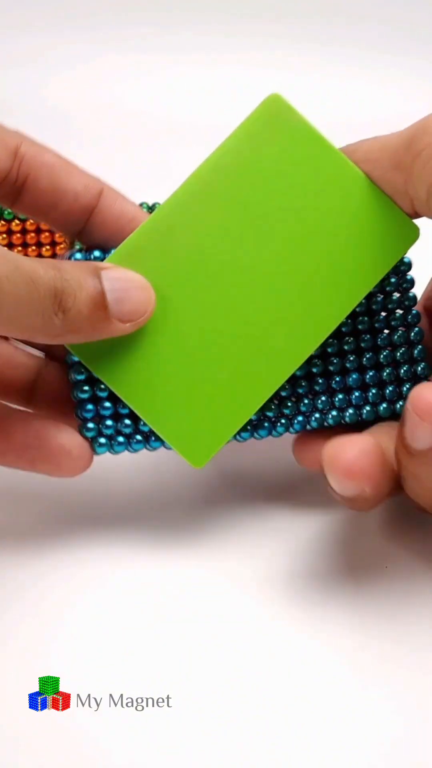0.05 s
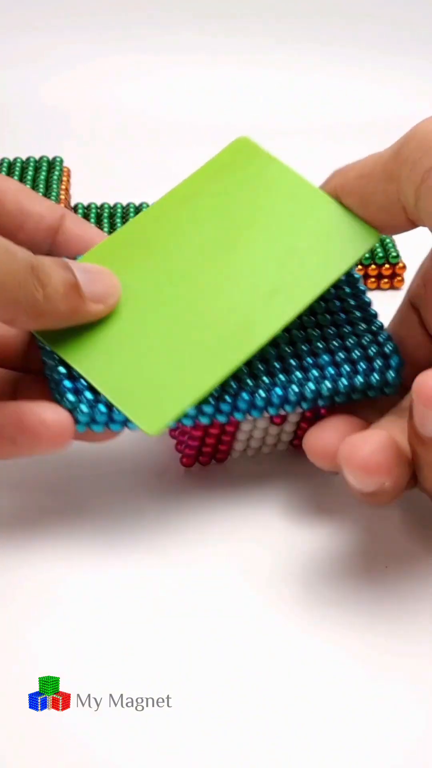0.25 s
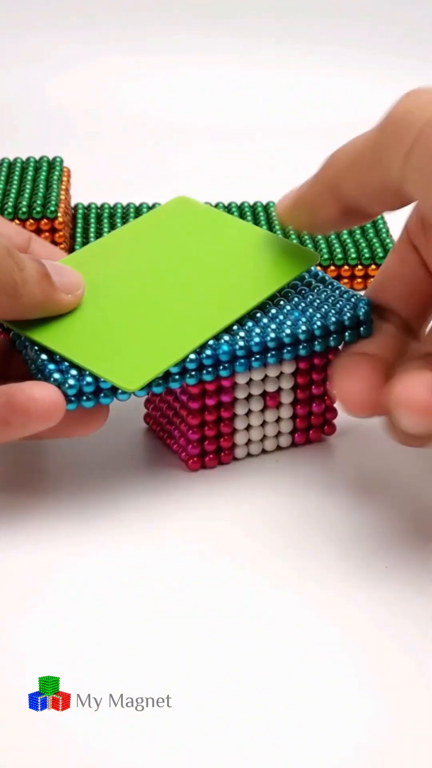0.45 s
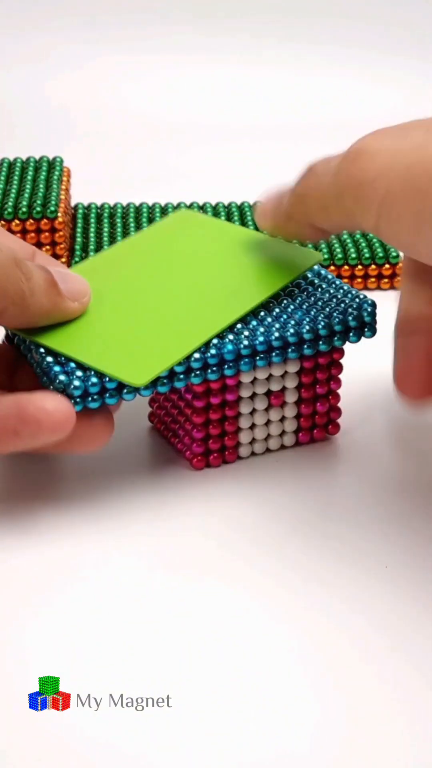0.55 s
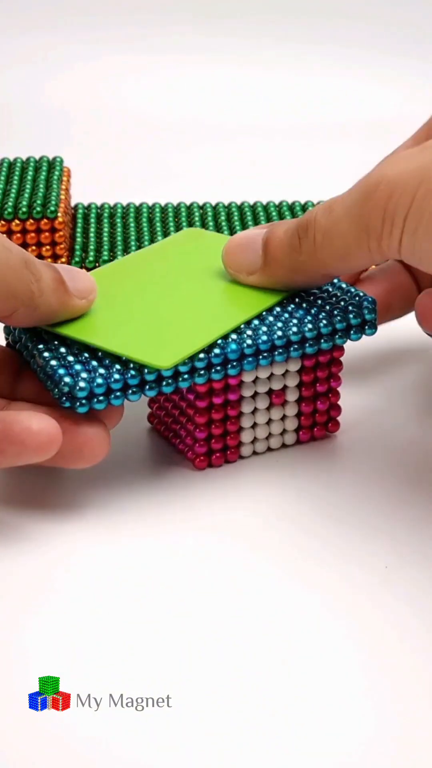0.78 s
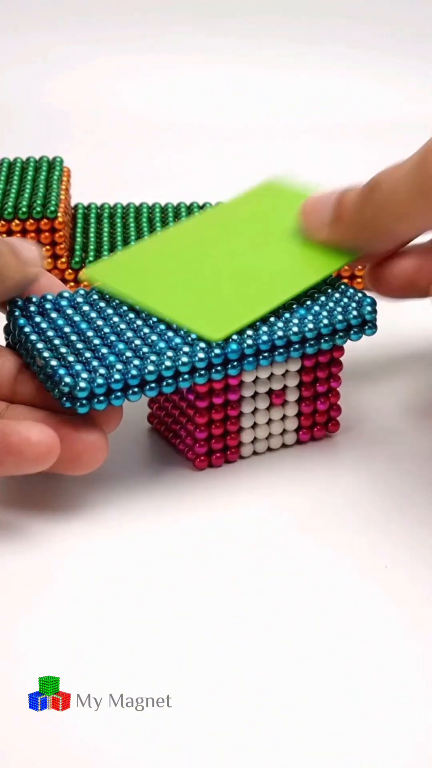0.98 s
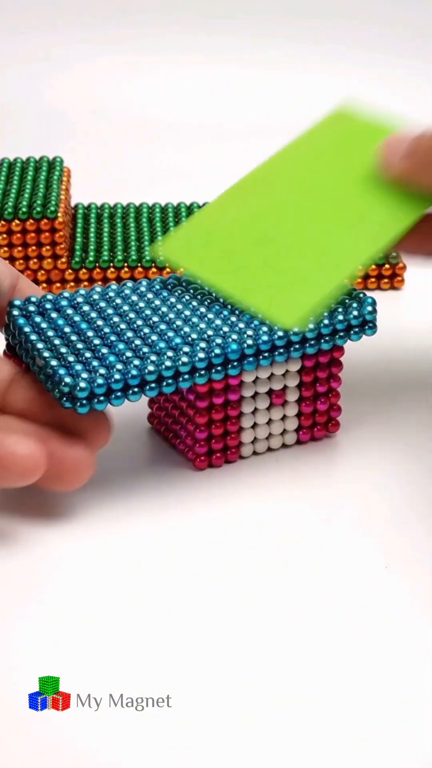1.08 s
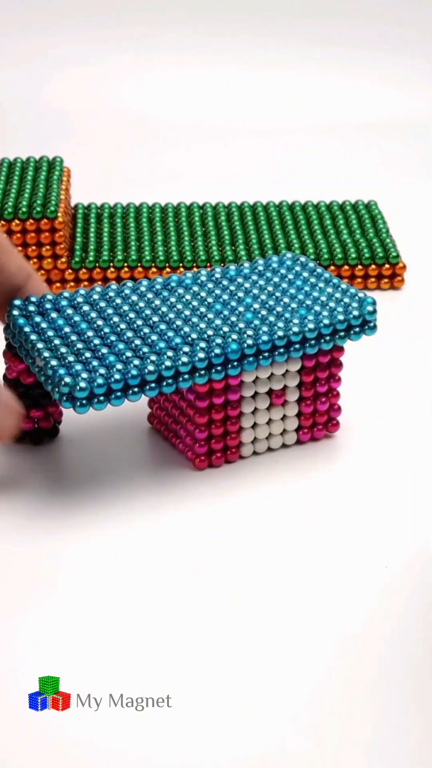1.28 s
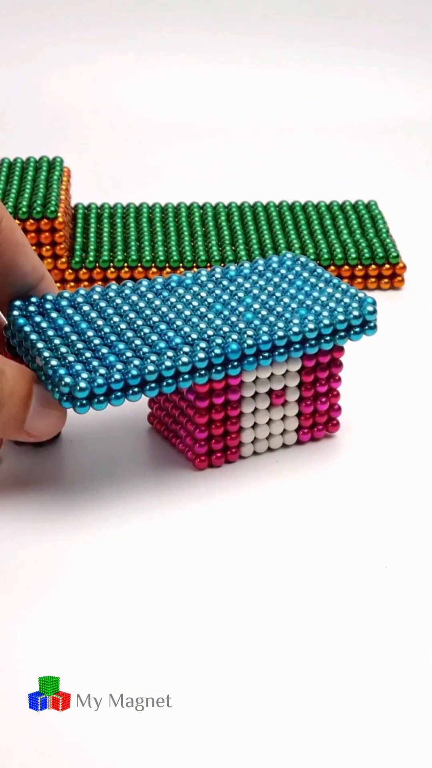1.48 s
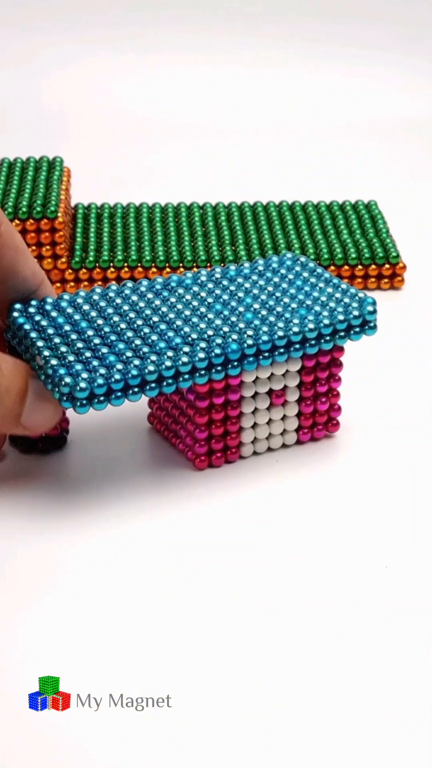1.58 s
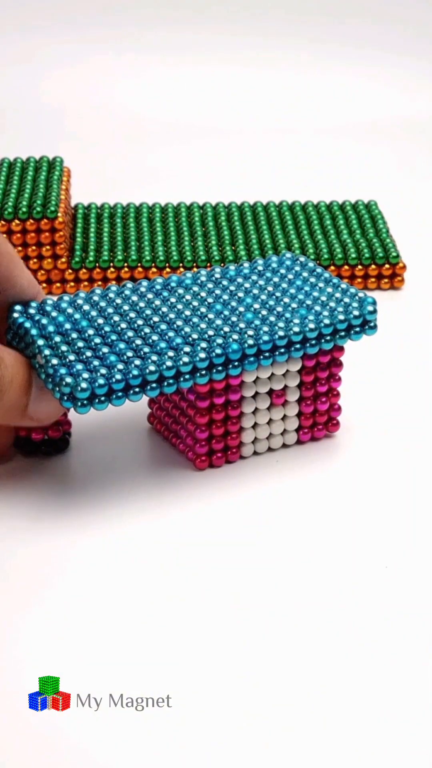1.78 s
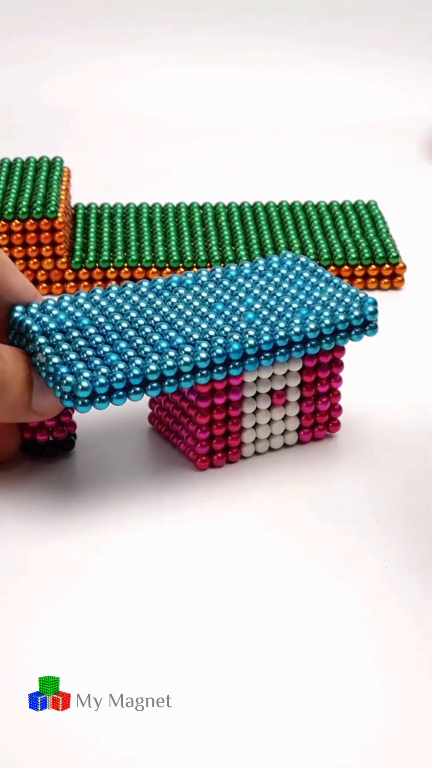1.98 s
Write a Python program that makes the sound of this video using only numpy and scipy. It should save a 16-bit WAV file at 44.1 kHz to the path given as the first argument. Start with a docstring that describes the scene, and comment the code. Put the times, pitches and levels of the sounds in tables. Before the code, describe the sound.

A slab of small magnetic balls lands with two dull, thudding knocks, then snaps sharply into place; a thin plastic card scrapes briefly and a ball pillar clatters in. Close microphone, wide late reverberation, faint rumble.

```python
"""Two dull knocks with low thuds: a slab of small magnet balls is set on a little house of the same balls.
The balls then snap together, a plastic card scrapes out, and a pillar bumps and clatters into place.
Struck bodies are sums of damped modes; crowds of small impacts are coloured noise bursts.
The contacts are close and central, with four one-sample clicks of overload; a wide, late reverberation
rings on over a faint rumble and hiss."""
import sys
import numpy as np
from scipy import signal
from scipy.fft import rfft, irfft
from scipy.io import wavfile
from scipy.ndimage import uniform_filter1d, minimum_filter1d

SR = 44100
rng = np.random.default_rng(int(sys.argv[2]) if len(sys.argv) > 2 else 0)


def pcm_store(signal):
    """Save signal as 16-bit PCM."""
    levels = np.round(np.clip(np.atleast_2d(signal), -1, 1) * 32767)
    wavfile.write(sys.argv[1], SR, levels.astype(np.int16).T)


N = 90404
T = np.arange(N) / SR  # time axis [s]
GRAIN_DB, CLATTER_GRAIN_DB = 2.5, 3.5  # unevenness of the clumps in which balls strike; of card and pillar


def amp(db):
    """Level to amplitude: 20 dB is a factor of ten."""
    return 10 ** (np.asarray(db) / 20)


def fade(t60):
    """Exponential decay: the amplitude falls by 60 dB in t60 seconds."""
    return np.exp(-np.log(1000) * T / t60)


def add(track, start_s, sound):
    """Superposition: mix a sound into the track from start_s on."""
    i = int(start_s * SR)
    track[i:] += sound[:N - i]


def along(points, hz):
    """Interpolate (frequency [Hz], value) points linearly on a logarithmic frequency axis."""
    point_hz, value = np.array(points, float).T
    return np.interp(np.log(hz + 1), np.log(point_hz), value)


def tint(x, points):
    """Minimum-phase filter: folding the cepstrum makes a (frequency [Hz], level [dB]) colour causal."""
    magnitude = amp(along(points, np.fft.rfftfreq(N, 1 / SR)))
    cepstrum = irfft(np.log(magnitude), N)
    cepstrum[1:N // 2] *= 2
    cepstrum[N // 2 + 1:] = 0
    return irfft(rfft(x) * np.exp(rfft(cepstrum)), N)


def soften(x, hz, order=2):
    """Low-pass: Butterworth roll-off above hz."""
    return signal.sosfilt(signal.butter(order, min(hz, SR / 2 - 1), fs=SR, output="sos"), x + 1e-18)


def low_cut(x, hz):
    """High-pass: Butterworth roll-off below hz."""
    return signal.sosfilt(signal.butter(2, hz, "high", fs=SR, output="sos"), x + 1e-18)


def noise(points):
    """Stationary random pressure with a given spectrum, scaled to unit deviation."""
    x = tint(rng.standard_normal(N), points)
    return x / x.std()


def burst(points, shape, grain_db=GRAIN_DB, size=16384, count=6):
    """Many small impacts at once: noise in uneven clumps, spread evenly in frequency, then coloured."""
    grain_s = 0.00082
    grid = np.arange(0, T[-1], grain_s)
    unevenness = np.interp(T, grid, rng.standard_normal(len(grid)))
    clumps = (shape * amp(grain_db * unevenness))[:size]
    x = rng.standard_normal(size) * clumps
    # Alternately flatten the spectrum and restore the envelope
    for _ in range(count):
        x = irfft(np.exp(1j * np.angle(rfft(x))))
        local_rms = np.sqrt(np.abs(uniform_filter1d(x ** 2, size=40)) + 1e-18)
        x = x * clumps / local_rms
    x = tint(np.pad(x, (0, N - size)), points)
    return x * np.sqrt(np.sum(shape ** 2) / np.sum(x ** 2))  # the energy of the envelope


def ring(modes):
    """Modal superposition: a struck body sounds as damped sines, successive modes opposite in sign."""
    out = np.zeros(N)
    for k, (hz, db, t60) in enumerate(modes):
        out += (-1) ** k * amp(db) * fade(t60) * np.sin(2 * np.pi * hz * T)
    return out


def rumble():
    """Low-frequency random noise of the room, its level slowly swelling and sinking."""
    # colour of the rumble: (frequency [Hz], level [dB])
    rumble_colour = [(25, -18), (50, -3), (75, 0), (140, -6.5), (210, -14.5), (450, -37.5), (1500, -50)]
    # swell of the rumble: (time [s], level above the base [dB])
    swell = [(0, -13), (.15, -2.5), (.35, 8), (.6, 3), (.9, 7), (1.2, -0.5), (1.58, 0.5), (1.86, 7.5),
             (2.05, 1.5)]
    base_db = -55.5
    return amp(base_db + np.interp(T, *np.array(swell).T)) * noise(rumble_colour)


def hiss():
    """Steady broadband noise, drawn afresh for each side so that the two are uncorrelated."""
    # colour of the hiss: (frequency [Hz], level [dB])
    hiss_colour = [(300, -3), (2000, -2), (9000, 5), (13000, -7), (16000, -14)]
    return amp(-77) * noise(hiss_colour)


def hall(x):
    """Diffuse reverberation of one side: sparse late reflections crowd together; the top band dies soonest."""
    # bands of the reverberation: (centre [Hz], level [dB], t60 [s])
    bands = [(60, -38, 1.0), (149, -37, 1.6), (366.7, -17.5, 1), (790, -12, 1.12), (2033, -13.5, 1.04),
             (4500, -16, 0.99), (7000, -14, 0.6)]
    predelay_s, bloom_s = 0.05, 0.054  # silence before the onset, and linear rise after it
    reflections_per_s, thicken_s = 250, 0.3  # density at the onset, and time in which it doubles
    density = reflections_per_s * (1 + (T / thicken_s) ** 2) / SR  # per sample
    signs = np.sign(rng.standard_normal(N))
    reflections = signs * (rng.random(N) < density) / np.sqrt(density)
    spectrum = rfft(reflections)
    hz, response = np.fft.rfftfreq(N, 1 / SR), np.zeros(N)
    for k, (_, db, t60) in enumerate(bands):
        # Weight 1 at this band's centre, 0 at its neighbours'
        share = along([(row[0], j == k) for j, row in enumerate(bands)], hz)
        shape = fade(t60) * np.minimum(T / bloom_s, 1)
        band = irfft(spectrum * share, N) * shape / np.linalg.norm(shape)
        add(response, predelay_s, amp(db) * band)
    return signal.fftconvolve(x, response)[:N]


def echoes(x, side, thin_hz=500):
    """Discrete early reflections: delayed copies without their bass, each weaker than the last."""
    # one row of delays for the left, one for the right: (delay [s], ...)
    delays = [(.0553, .0628, .067, .0755, .091, .1073, .125), (.052, .0708, .0803, .0912, .101, .122)]
    start_db, fall_db_per_s = -14, 103
    out, thin = np.zeros(N), low_cut(x, thin_hz)
    for delay in delays[side]:
        add(out, delay, amp(start_db - fall_db_per_s * delay) * thin)
    return out


def air(x):
    """Envelope modulation: a faint hiss follows the square root of the contacts' smoothed envelope."""
    # colour of the hiss on the contacts: (frequency [Hz], level [dB])
    air_colour = [(3000, -1), (7500, -4), (10000, -11), (15000, -8.5)]
    envelope = np.abs(uniform_filter1d(np.abs(signal.hilbert(x)), size=1500))
    return noise(air_colour) * amp(-58.5) * np.sqrt(envelope)


def overload_clicks():
    """Impulses have a flat spectrum: one-sample clicks of overload at four listed times."""
    # clicks: (time [s], level [dB])
    clicks = [(.2397, -26.5), (.443, -33.5), (0.8091, -24.5), (1.7458, -17)]
    out = np.zeros(N)
    for s, db in clicks:
        out[int(s * SR)] += amp(db)
    return out


def thuds(waver=0.057):
    """Soft forces excite low swings: Gaussian swells on tones whose frequency wavers (relative deviation)."""
    # thuds of the table and hands: (time of the top [s], level [dB], frequency [Hz],
    # rise to the top from 1/e [s], fall from the top to 1/e [s])
    pushes = [(0.278, -19, 53, 0.02, 0.029), (0.257, -16, 132, 0.019, 0.022),
              (0.386, -27, 147.8, 0.011, 0.067), (0.432, -23.5, 117.6, 0.035, 0.01),
              (0.458, -27.5, 65.5, 0.013, 0.05), (0.501, -19, 126.5, 0.035, 0.036),
              (0.547, -25.5, 121, 0.0074, 0.0083), (.446, -25.5, 277, 0.0036, 0.018),
              (.51, -26.5, 199.4, 0.024, 0.032), (.628, -34.5, 68, 0.013, 0.007),
              (0.67, -29, 56.7, 0.012, 0.02), (0.831, -37, 61.4, 0.0085, 0.036),
              (.832, -34.5, 291, 0.028, 0.027), (0.989, -43.5, 69.2, .04, 0.048),
              (1.44, -45.5, 75, 0.016, 0.028), (1.662, -18, 312, 0.012, 0.009),
              (1.691, -18, 224.3, 0.0025, 0.0029), (1.674, -33.5, 214, 0.03, 0.024),
              (1.672, -35, 70, 0.032, 0.028), (1.72, -27, 233.8, 0.0042, 0.0086),
              (1.758, -33.5, 73, 0.023, 0.0072), (1.792, -32.5, 255, 0.014, 0.015),
              (2.011, -43.5, 59, 0.011, 0.03045)]
    out = np.zeros(N)
    for s, db, hz, rise, fall in pushes:
        drift = uniform_filter1d(rng.standard_normal(N), size=400)
        turns = np.cumsum(hz * (1 + waver * drift / drift.std())) / SR
        swell = np.exp(-((T - s) / np.where(T < s, rise, fall)) ** 2)
        turns_from_top = turns - np.interp(s, T, turns)
        out += amp(db) * swell * np.cos(2 * np.pi * turns_from_top)
    return out


def card():
    """Stick-slip over rows of balls; the card's resonance tends to sink as more of it comes free."""
    # catches of the card: (time [s], level [dB], time to fall by 30 dB [s], ring of the card [Hz])
    catches = [(.957, -32.5, 0.13, 1744), (0.962, -34, 0.021, 1690), (0.9778, -24.5, 0.016, 1720),
               (.989, -33.5, 0.1, 1684), (1.004, -28.5, 0.04, 1670), (1.018, -28, 0.014, 1469)]
    # colour of the scrape: (multiple of the ring frequency, level [dB])
    scrape_colour = [(.12, -21), (.42, -32), (.57, 6.5), (.7, -17.5), (.83, 8), (1., 14), (1.22, 7.5),
                     (1.36, -31.5), (2, -35), (2.6, -7.5), (4, -33)]
    ring_db = -9
    out = np.zeros(N)
    for s, db, length, hz in catches:
        t60 = 2 * length
        colour = [(hz * multiple, gain) for multiple, gain in scrape_colour]
        scrape = burst(colour, fade(t60), CLATTER_GRAIN_DB)
        add(out, s, amp(db) * (scrape + ring([(hz, ring_db, t60)])))
    return out


def pillar():
    """Repeated impact: the pillar, pulled under the roof, clacks in a quick run of bursts with ringing modes."""
    # clacks of the pillar's balls: (time [s], level [dB], t60 of the burst [s], roll-off [Hz])
    clacks = [(1.7164, -18, 0.068, 8931), (1.7239, -21, 0.062, 8060), (1.736, -25, 0.21, 7000),
              (1.7452, -4.5, 0.016, 8900), (1.747, -9, 0.016, 7000), (1.7549, -11.5, 0.028, 5860),
              (1.7611, -14, 0.041, 4900), (1.7668, -15.5, 0.036, 1790), (1.783, -16.5, 0.028, 5150),
              (1.792, -25, 0.056, 4900), (1.827, -21.5, 0.0094, 5000), (1.839, -45, 0.013, 8000)]
    # colour of a clack: (frequency [Hz], level [dB])
    clack_colour = [(88, -43), (150, -11.5), (312, -5.5), (439, -11.5), (499, -3), (637, -10), (1110, -3),
                    (1300, -10.5), (1690, -3.5), (2190, -8), (2500, -3), (3460, -4), (4700, -3.5),
                    (6100, -5.5), (6620, -5), (7300, -32), (9490, -76), (16100, -120)]
    # modes of the pillar: (frequency [Hz], relative level [dB], t60 [s])
    pillar_modes = [(1840, -15.5, .015), (2481, -5, 0.025), (2860, -19, 0.023)]
    out, body = np.zeros(N), amp(-2.5) * ring(pillar_modes)
    for s, db, t60, hz in clacks:
        clatter = burst(clack_colour, fade(t60), CLATTER_GRAIN_DB, count=2)
        add(out, s, amp(db) * soften(clatter + body, hz))
    return out


def snap():
    """Incoherent impacts add in power: rows of balls jump onto the walls in one crack, then ring and settle."""
    # snaps of the slab onto the walls: (time [s], level [dB])
    snaps = [(0.8056, -15.5), (0.808, -4.5), (0.8097, -8.5), (0.8127, -16)]
    # modes of the joined balls: (frequency [Hz], level [dB], t60 [s])
    joined_modes = [(795, -27.5, 0.013), (1000, -22.5, .05), (1474, -20.5, .08), (2003, -21, .04),
                    (2475, -30.5, 0.087)]
    # colours of the crack and of the settling rattle: (frequency [Hz], level [dB])
    crack_colour = [(200, -23.5), (600, -11.5), (900, -5), (1350, -23.5), (1480, 7.5), (1650, -4.5),
                    (2030, 7.5), (2280, -25), (2500, -5.5), (2680, -23.5), (3400, -30.5), (3620, -10),
                    (3860, 2.5), (4020, -3.5), (4300, 2.5), (4700, 0), (5050, -12.5), (5400, -19.5),
                    (5780, -1), (6100, -18), (7200, -29.5)]
    settle_colour = [(150, 0), (300, 0), (500, -6.5), (850, 1.5), (1200, -11.5), (1800, 7), (3000, -15.5),
                     (4400, -4), (7000, -21)]
    crack_t60_s, settle_db, settle_t60_s = 0.0097, -23.5, 0.21
    out, power = np.zeros(N), np.zeros(N)
    start = min(s for s, _ in snaps)
    for s, db in snaps:
        add(power, s - start, (amp(db) * fade(crack_t60_s)) ** 2)
    add(out, start, burst(crack_colour, np.sqrt(power)))
    settling = amp(settle_db) * burst(settle_colour, fade(settle_t60_s))
    add(out, snaps[1][0], ring(joined_modes) + settling)  # from the strongest snap
    return out


def slab(body_top_hz=3100):
    """Modal excitation: the place struck weights the slab's modes and a soft contact dulls them; rubs are noise."""
    # knocks of the slab, the fifth row only a faint dull sound in the wake of the others: (time [s], level
    # [dB], roll-off of the contact [Hz], place struck [0 edge to 1 face])
    knocks = [(0.2273, -0.5, 3010, 0.088), (0.2387, -4.5, 3000, 0.052), (0.4375, -14, 3493, 0.82),
              (.4418, 1.5, 927, 0.75), (.624, -37.5, 1500, 1), (.646, -36, 5038, 0.73)]
    # modes of the slab: (frequency [Hz], t60 [s], level struck on the edge [dB], on the face [dB])
    slab_modes = [(130.9, 0.19, -17.5, -11.5), (184.4, 0.14, -24, -13.5), (327.4, 0.14, -9.5, -16.5),
                  (447, 0.087, -19, -19), (506.8, 0.11, -20.5, -16.5), (579, 0.12, -19.5, -12),
                  (790, 0.086, -13.5, -6.5), (796, 1, -43, -35.5), (912, 0.078, -18.5, -36),
                  (983, .07, -22, -30), (1172, 0.081, -18, -36), (1623, .05, -21.5, -43),
                  (1895.5, 0.06, -16, -4), (1900, .7, -49, -44.5), (2124, 0.045, -19, -12.5),
                  (2410, 0.037, -18, -7), (2715, 0.023, -19.5, -12)]
    # colour of the dense rattle inside: (frequency [Hz], level struck on the edge [dB], on the face [dB])
    rattle_colour = [(59.6, -4, -5), (290, -4.5, 14), (785, -4.5, -3.5), (1430, 1, -8), (2570, -14, -4.5),
                     (3140, -6, -19.5), (3750, -41, -36), (4867, -25, -44.5), (5412, -8, -34.5),
                     (6700, -9, -34.5), (7300, -39.5, -44)]
    # rubs of the slab on the walls: (time of the top [s], level [dB], half length to 1/e [s])
    rubs = [(0.268, -24.5, 0.022), (0.433, -37, 0.029), (0.478, -29, 0.045), (0.707, -40.5, 0.015)]
    # colour of the rubbing: (frequency [Hz], level [dB])
    rub_colour = [(60, -7.5), (180, 1), (300, 5.5), (400, -3), (560, -5.5), (800, -4.5), (1100, -5.5),
                  (1500, -17), (2600, -24), (3300, -48.5)]
    rattle_db, rattle_t60_s = -16, 0.051
    pressure = sum(amp(db) * np.exp(-((T - s) / half) ** 2) for s, db, half in rubs)
    out = noise(rub_colour) * pressure
    for s, db, hz, place in knocks:
        modes = [(f, edge + place * (face - edge), t60) for f, t60, edge, face in slab_modes]
        colour = [(f, edge + place * (face - edge)) for f, edge, face in rattle_colour]
        body = soften(ring(modes), body_top_hz, order=8)
        rattle = amp(rattle_db) * burst(colour, fade(rattle_t60_s))
        add(out, s, amp(db) * soften(body + rattle, hz))
    return out


def scene():
    """Direct sound in the centre, uncorrelated reverberation on the two sides, and the quiet room."""
    contacts = slab() + thuds() + snap() + card() + pillar()
    close = soften(contacts, 6580, order=14)  # steep top of the contacts [Hz]
    centre = close + air(close) + overload_clicks() + rumble()
    return np.array([centre + hall(close) + echoes(close, side) + hiss() for side in range(2)])


def record(dry):
    """Band limiting and peak limiting: bass cut, a fast gain shared by both sides, then a top roll-off."""
    low_cut_hz, ceiling, roll_off_hz, top_hz = 26, 0.71, 14300, 16000  # ceiling as a part of full scale
    x = low_cut(dry, low_cut_hz)
    gain = np.minimum(1, ceiling / (np.abs(x).max(axis=0) + 1e-9))
    x = x * uniform_filter1d(minimum_filter1d(gain, size=7), size=7)
    steep_top = signal.ellip(8, .2, 70, top_hz, fs=SR, output="sos")
    return signal.sosfilt(steep_top, soften(x, roll_off_hz))


dry = scene()
out = record(dry)
pcm_store(out)
```